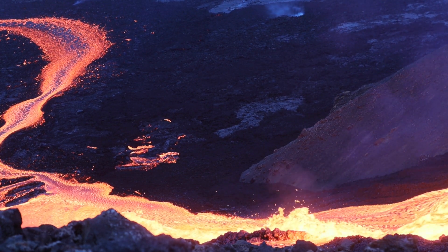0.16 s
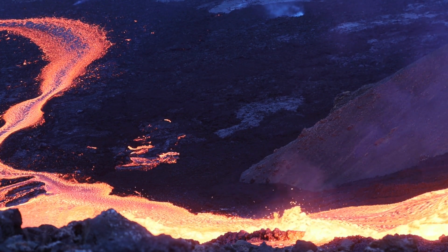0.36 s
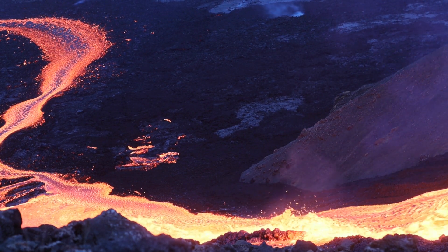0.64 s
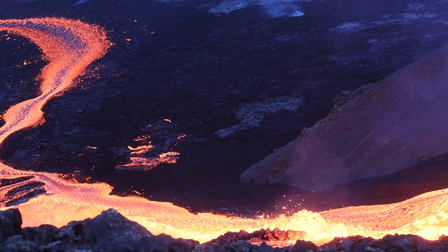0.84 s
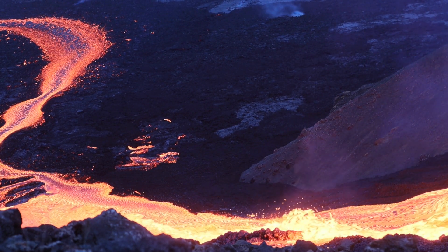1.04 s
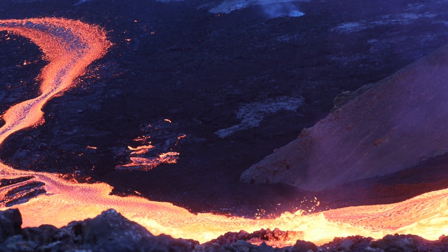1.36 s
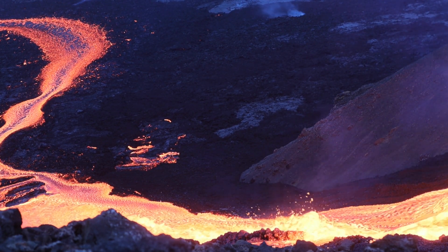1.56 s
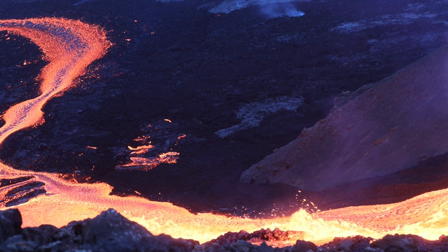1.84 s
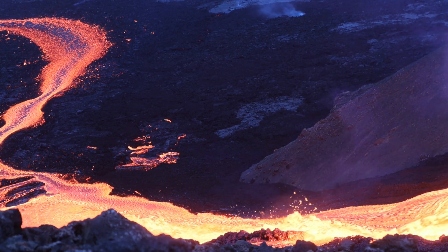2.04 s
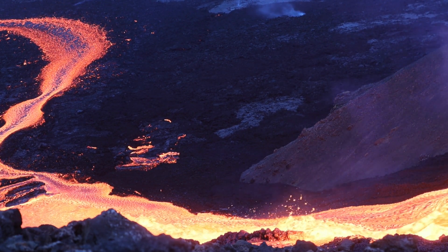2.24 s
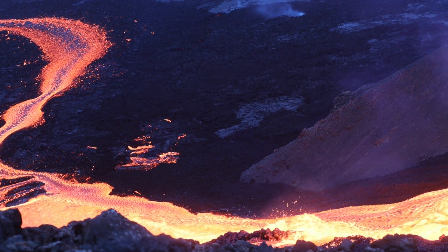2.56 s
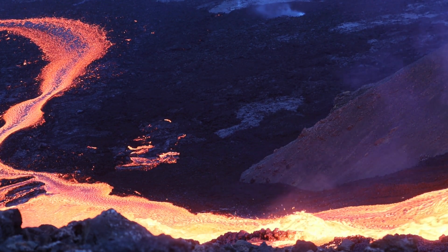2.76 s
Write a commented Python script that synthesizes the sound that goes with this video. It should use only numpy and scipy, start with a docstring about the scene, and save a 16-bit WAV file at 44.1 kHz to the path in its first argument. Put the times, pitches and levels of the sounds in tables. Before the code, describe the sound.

A lava river rushes and bubbles close on the right, with scattered dull spatters and small gas puffs; outdoor wind buffets the stereo microphone throughout, and a large ragged gas burst comes near the end.

```python
"""Lava river bank: the melt churns and spatters to the right, wind rolls over a two-port microphone.
Shaped noise and countless small bubbles make the rush; clots slap down as short dull sprays.
Gas pockets tear open, a large one near the end with a ragged cough. A flaring fine hiss lies above.
The left port hears the lava shaded, with a short rock echo; a far wash comes from upstream."""
import sys
import numpy as np
from scipy import signal
from scipy.fft import rfft, irfft
from scipy.io import wavfile
from scipy.ndimage import uniform_filter1d

SR = 44100
rng = np.random.default_rng(int(sys.argv[2]) if len(sys.argv) > 2 else 0)


def persist_wave(psi):
    """Save psi, clipped to +-1, as 16-bit WAV."""
    counts = np.round(np.clip(psi, -1, 1) * 32767).astype(np.int16)
    wavfile.write(sys.argv[1], SR, np.atleast_2d(counts).T)


N = 128331
T, HZ = np.arange(N) / SR, np.fft.rfftfreq(N, 1 / SR)

# Levels are nominal, ahead of later gains; spectra are relative.
# churning strength: t/s, level/dB
CHURN = [(0, -31.5), (.17, -32), (.24, -34), (.33, -32), (.42, -34), (.7, -33), (.88, -34), (1.1, -33),
         (1.22, -32.5), (1.32, -30.5), (1.5, -32.5), (1.72, -30.5), (1.88, -33.5), (1.98, -29),
         (2.08, -33.5), (2.2, -29.5), (2.28, -34), (2.45, -32), (2.53, -30.5), (2.6, -28.5), (2.68, -31),
         (2.74, -28), (2.79, -30), (2.91, -27.5)]
# churning lava spectrum: f/Hz, level/dB
RUSH_SPECTRUM = [(60, 0.5), (250, 0.5), (400, 0.5), (475, 3), (570, 1.5), (700, 0), (1000, -1.1),
                 (1330, -1.7), (1750, -6), (2500, -8), (3300, -12), (4200, -14.5), (6000, -17), (9000, -30),
                 (15000, -44.5)]
# clots landing: t/s, level/dB, pitch f/Hz, left port gain/dB
SLAPS = [(0.084, -29.5, 800, -8), (.186, -33, 2300, 0), (0.284, -25.5, 720, 3), (.661, -25.5, 330, 5),
         (0.721, -28, 700, 2), (0.733, -26, 360, 4), (1.07, -27, 550, -2), (1.175, -32.5, 1400, -2),
         (1.235, -28, 900, 0), (1.3, -30, 1230, 0), (1.319, -29, 1170, -2), (1.356, -35, 2400, -2),
         (1.428, -33, 1220, 0), (1.582, -30.5, 756, 0), (1.714, -33.5, 2400, 6), (1.809, -25.5, 1800, 2),
         (1.94, -29, 848, 0), (1.986, -32.5, 1860, -3), (2.505, -27.5, 1700, 3), (2.554, -26, 520, 0),
         (2.575, -28.5, 1240, 0), (2.642, -19, 850, -2), (2.688, -23, 600, 0), (2.713, -24.5, 480, 0),
         (2.803, -32.5, 2300, 1), (2.814, -23, 500, 0), (2.858, -24.5, 1100, 2), (2.881, -24, 846, 2)]
# gas pockets opening; the big one leaks, then coughs twice: t/s, level/dB, rise/s, hold/s, pitch factor
PUFFS = [(0.642, -31, 0.012, .035, 0.64), (0.712, -30, 0.0098, 0.012, 0.72), (1.813, -31, .02, 0.032, 0.37),
         (2.555, -31, 0.068, 0.051, 0.96), (2.612, -20.5, 0.014, 0.005, .88),
         (2.63, -22.3, 0.011, .011, 1.08)]
# escaping gas spectrum at pitch factor 1: f/Hz, level/dB
GAS_SPECTRUM = [(100, -10), (280, -1), (480, 5), (700, 1), (1050, -1.3), (1500, -12), (3000, -20.5),
                (6000, -29), (9000, -38), (14000, -68)]
# lava at the left port, which faces away: f/Hz, gain/dB
SHADOW = [(200, -24), (450, -16.5), (700, -20), (1250, -13.5), (2000, -16), (3300, -13), (4200, -20),
          (6000, -6), (9000, 0.5)]
# left port phase lead: f/Hz, phase/rad
PORT_PHASE = [(500, 0), (2000, 0), (3300, 0.13), (4400, 0.98), (5400, 0.77), (8500, 0.92), (10500, 0.23)]
# wind gusts: t/s, level/dB
GUSTS = [(0, -27.5), (.06, -27), (.13, -22.5), (.2, -24.5), (.3, -30), (.41, -28.5), (.49, -25),
         (.6, -29.5), (.66, -22.5), (.73, -25), (.81, -29.5), (.9, -24), (.99, -24.5), (1.04, -22.5),
         (1.13, -23.5), (1.21, -24), (1.27, -28.5), (1.34, -30), (1.38, -24), (1.44, -25.5), (1.5, -22.5),
         (1.6, -26), (1.72, -23), (1.9, -24), (2.17, -23), (2.25, -29), (2.47, -27), (2.55, -23),
         (2.64, -27.5), (2.76, -26), (2.91, -29)]
# wind eddy spectrum: f/Hz, level/dB
WIND_SPECTRUM = [(10, -10), (25, -3), (45, 2.2), (70, 0.2), (108, -2.2), (150, -8.2), (215, -13.5),
                 (300, -18.5), (420, -25.5), (700, -40), (2000, -71)]
# wind left-right correlation: f/Hz, correlation/1
WIND_LIKENESS = [(40, 0.5), (110, 0.58), (200, -0.19), (400, -0.4)]
# left port's share of the wind: f/Hz, gain/dB
WIND_LEFT = [(50, -3), (130, -3), (210, -1), (310, -0.5), (500, -1.5)]
# single eddies striking the ports: t/s, peak/dB, pitch f/Hz
THUMPS = [(0.139, -15, 45.2), (0.475, -14.5, 39), (1.03, -17, 108), (1.848, -10.5, 50.4), (2.163, -14, 107),
          (2.543, -15, 105), (2.753, -15, 53.5)]
# hiss spectrum: f/Hz, level/dB
HISS_SPECTRUM = [(1500, 3), (3000, 1.5), (4000, -3), (5300, 3), (6500, -2.5), (8000, -5.5), (10000, -13),
                 (12500, -17.5), (15500, -18)]
# hiss left-right correlation: f/Hz, correlation/1
HISS_LIKENESS = [(3000, 0.77), (5200, 1), (8500, 0.73), (11000, -0.033), (14000, -0.7)]
# brief hiss flares, the last with the big burst's spray: t/s, rise/dB
FLARES = [(.17, 3), (.283, 2), (.65, 2.5), (.992, 2), (2.165, 3.5), (2.63, 5.5)]
# far river spectrum: f/Hz, level/dB
FAR_SPECTRUM = [(100, 12.5), (450, 6.5), (700, -2), (1250, 0.5), (2000, -2), (3500, -10), (8000, -23),
                (15000, -41)]

RUSH_DB, SURGE_DB, SURGE_HZ = -5.5, 0.5, 28
PATCH_DB, PATCH_HZ, PATCH_S = 1.4, 880, 0.035
BUBBLES_DB, BUBBLES_PER_S, BUBBLE_SPREAD_DB, BUBBLE_CYCLES = -8.5, 1800, 2, 1.08
SLAP_RISE_S, SLAP_DECAY_S, SLAP_OCTAVES = 0.0004, 0.0031, 0.7
BURST_DECAY_S, RAGGED_DB, RAGGED_HZ = 0.016, 1.5, 90
FLAPS_PER_S, FLAP_DEPTH = 220, 0.38  # nominal rate; depth 0..1
ECHO_S, ECHO_DB, SCATTER_DB, SCATTER_DECAY_S = 0.0045, -12, -17.5, 0.045
WIND_DB, EDDY_S, THUMP_CYCLES = 2.2, 0.14, 0.33
HISS_DB, HISS_SWELL_DB, HISS_SWELL_HZ, FLARE_S = -45.5, 0.8, 15, 0.0069
FAR_DB = -47
EDGE_HZ, FADE_S = 15750, 0.004


def amp(db):
    """Decibels to gain."""
    return 10 ** (np.asarray(db) / 20)


def unit(x):
    """Scale to rms 1."""
    return x / np.sqrt(np.mean(x ** 2) + 1e-20)


def read(points):
    """Interpolate a frequency table on a log axis."""
    f_hz, value = np.transpose(points)
    return np.interp(np.log(HZ + 1), np.log(f_hz + 1), value)


def level(points):
    """Interpolate a dB-over-time table, as gain."""
    return amp(np.interp(T, *np.transpose(points)))


def colour(x, spectrum):
    """Filter x by a spectrum, then scale to rms 1."""
    return unit(irfft(rfft(x) * amp(read(spectrum)), N))


def wander(rate_hz):
    """Random drift, low-passed near rate_hz, rms 1."""
    lowpass = (HZ > 2) / (1 + (HZ / rate_hz) ** 4)
    return unit(irfft(rfft(rng.standard_normal(N)) * lowpass, N))


def pair(likeness, phase_rad=0):
    """White noise at two ports, correlated by frequency; the left leads by phase_rad."""
    a, b = rfft(rng.standard_normal((2, N)))
    c = np.clip(read(likeness), -1, 1)
    left = (c * a + np.sqrt(1 - c ** 2) * b) * np.exp(1j * phase_rad)
    return irfft(np.array([left, a]), N)


def rush():
    """Blur of the churning: noise swelling in patches of pitch and time."""
    frame, hop = 512, 128
    z = signal.stft(rng.standard_normal(N), nperseg=frame, noverlap=frame - hop)[2]
    patches = rng.standard_normal(z.shape)
    patches = uniform_filter1d(patches, round(PATCH_HZ * frame / SR), axis=0)
    patches = uniform_filter1d(patches, round(PATCH_S * SR / hop), axis=1)
    patchy = z * amp(PATCH_DB * unit(patches))
    x = signal.istft(patchy, nperseg=frame, noverlap=frame - hop)[1][:N]
    return amp(RUSH_DB) * colour(x, RUSH_SPECTRUM)


def bubbles(count=28):
    """Small bubbles snap open in the thick melt, each ringing dead within a few cycles."""
    out, t = np.zeros(N), T[:SR // 40]
    for hz in np.geomspace(300, 7000, count):
        born = rng.random(N) < BUBBLES_PER_S / count / SR
        size_db = BUBBLE_SPREAD_DB * np.minimum(rng.exponential(1, N), 4)
        size = amp(size_db) * rng.choice([-1, 1], N)
        age = t * hz / BUBBLE_CYCLES
        ring = age * np.exp(-2 * age) * np.sin(2 * np.pi * hz * t)
        out += hz * signal.oaconvolve(born * size, ring)[:N]
    return amp(BUBBLES_DB) * colour(out, RUSH_SPECTRUM)


def slap(start_s, db, hz):
    """A soft clot lands: a short dull noise spray around one pitch."""
    age_s = np.maximum(T - start_s, 0)
    band = np.exp(-0.5 * (np.log2((HZ + 1) / hz) / SLAP_OCTAVES) ** 2)
    shape = (1 - np.exp(-age_s / SLAP_RISE_S)) * np.exp(-age_s / SLAP_DECAY_S)
    spray = unit(irfft(rfft(shape * rng.standard_normal(N)) * band, N))
    return amp(db) * spray * shape.std() / shape.max()


def burst(start_s, db, rise_s, hold_s, pitch_factor):
    """Gas swells, tears through a flapping skin of melt and dies away raggedly."""
    age_s = np.maximum(T - start_s, 0)
    decay = np.exp(-np.maximum(age_s - rise_s - hold_s, 0) / BURST_DECAY_S)
    shape = np.minimum(age_s / rise_s, 1) * decay
    # one pulse per whole turn, at an unsteady rate
    turns = np.cumsum(FLAPS_PER_S * np.exp(0.35 * wander(FLAPS_PER_S))) / SR
    flaps = unit(np.diff(np.floor(turns), prepend=0))
    torn = (1 - FLAP_DEPTH) * rng.standard_normal(N) - FLAP_DEPTH * flaps
    gas = shape * amp(RAGGED_DB * wander(RAGGED_HZ)) * torn
    spectrum = np.array(GAS_SPECTRUM) * [pitch_factor, 1]
    return amp(db) * shape.std() * colour(gas, spectrum)


def outdoors(lava):
    """Left port hears the lava shaded, plus one rock echo; rough ground scatters to both."""
    left, right = rfft(lava)
    left = left * amp(read(SHADOW)) * np.exp(1j * read(PORT_PHASE))
    left = left + amp(ECHO_DB) * right * np.exp(-2j * np.pi * HZ * ECHO_S)
    direct = irfft(np.array([left, right]), N)
    tail = rng.standard_normal((2, SR // 4)) * np.exp(-T[:SR // 4] / SCATTER_DECAY_S)
    tail /= np.linalg.norm(tail, axis=1, keepdims=True)
    scatter = signal.fftconvolve(lava[1:], tail, axes=1)[:, :N]
    return direct + amp(SCATTER_DB) * scatter


def wind():
    """Low eddies at each port, evened out, then swelling with the gusts; thumps on top."""
    eddies = colour(pair(WIND_LIKENESS), WIND_SPECTRUM)
    power = uniform_filter1d((eddies ** 2).mean(0), size=round(EDDY_S * SR))
    roll = unit(eddies / np.sqrt(power)) * level(GUSTS) * amp(WIND_DB)
    left, right = roll + sum(thump(*row) for row in THUMPS)
    return np.array([irfft(rfft(left) * amp(read(WIND_LEFT)), N), right])


def thump(centre_s, db, hz):
    """One eddy passes: a brief swing of pressure at random phase."""
    cycles = (T - centre_s) * hz
    swing = np.cos(2 * np.pi * (cycles + rng.random()))
    return amp(db) * np.exp(-0.5 * (cycles / THUMP_CYCLES) ** 2) * swing


def hiss():
    """Fine high noise at both ports, gently swelling, with brief flares."""
    swell_db = HISS_SWELL_DB * wander(HISS_SWELL_HZ)
    flares_db = sum(db * np.exp(-0.5 * ((T - s) / FLARE_S) ** 2) for s, db in FLARES)
    noise = colour(pair(HISS_LIKENESS, read(PORT_PHASE)), HISS_SPECTRUM)
    return amp(HISS_DB + swell_db + flares_db) * noise


def far_river():
    """Smooth wash from upstream, independent noise at each port."""
    return amp(FAR_DB) * colour(rng.standard_normal((2, N)), FAR_SPECTRUM)


def scene():
    """Lava to the right, under wind and hiss."""
    river = (rush() + bubbles()) * level(CHURN) * amp(SURGE_DB * wander(SURGE_HZ))
    clots = sum(slap(s, db, hz) * amp([[left_db], [0]]) for s, db, hz, left_db in SLAPS)
    pockets = sum(burst(*row) for row in PUFFS)
    return outdoors(river + pockets + clots) + far_river() + wind() + hiss()


def record(dry):
    """Fade both ends, then low-pass at the band limit."""
    ends = np.minimum(np.minimum(T, T[::-1]) / FADE_S, 1)
    lowpass = signal.firwin(511, EDGE_HZ, window=("kaiser", 9), fs=SR)
    return signal.oaconvolve(dry * ends, lowpass[None], "same")


dry = scene()
out = record(dry)
persist_wave(out)
```